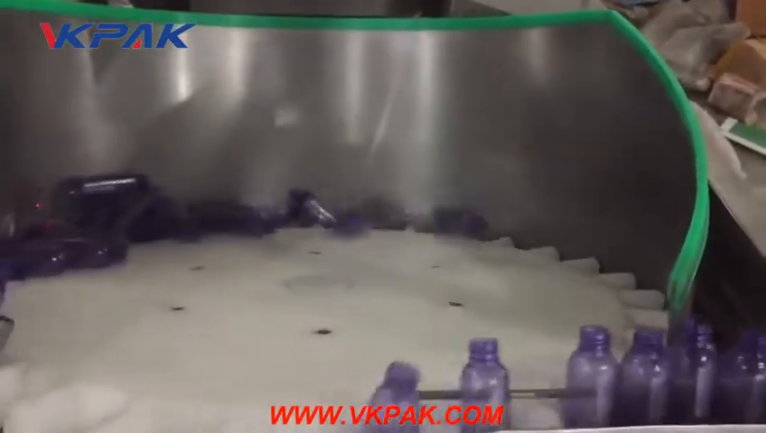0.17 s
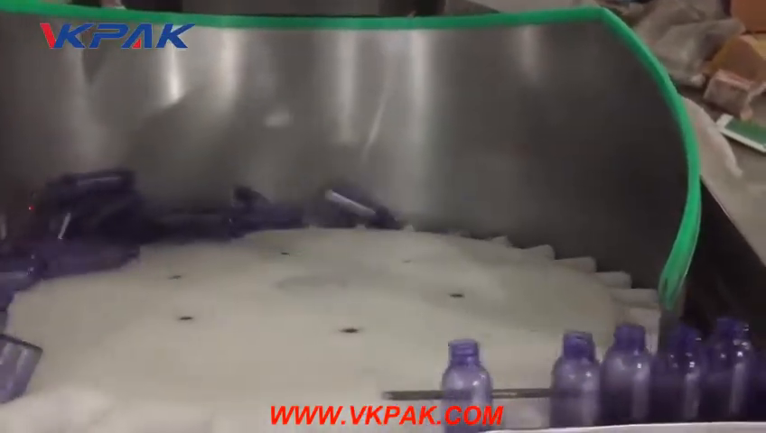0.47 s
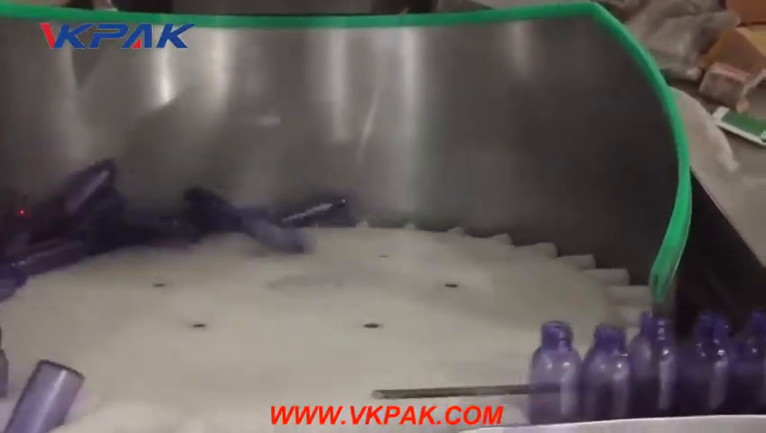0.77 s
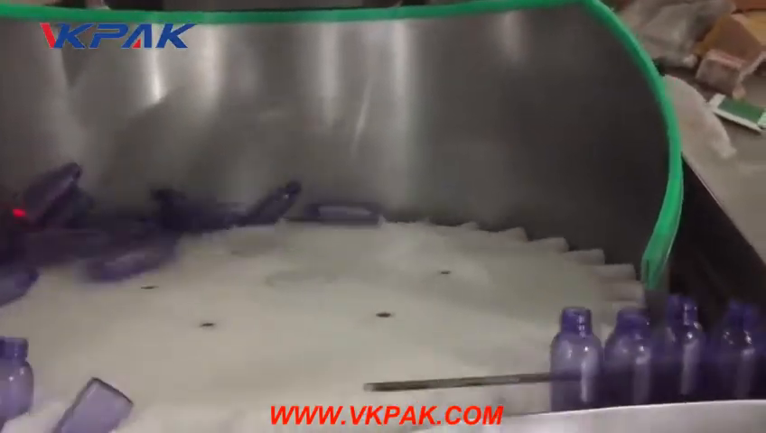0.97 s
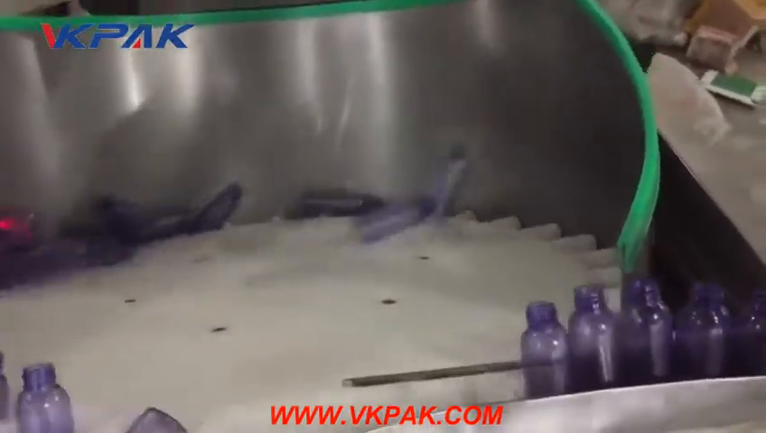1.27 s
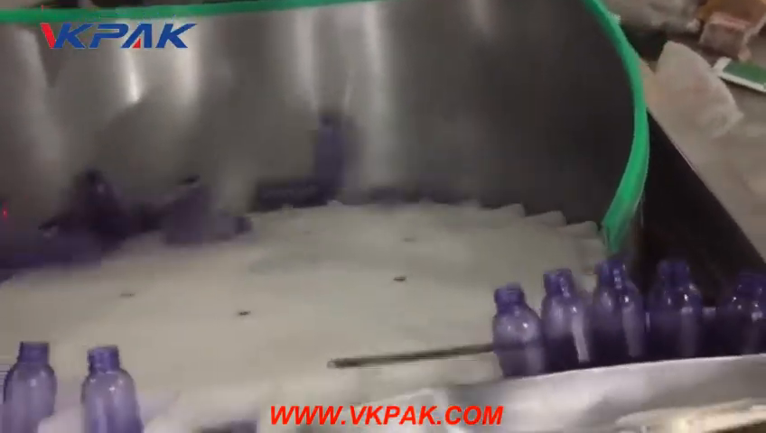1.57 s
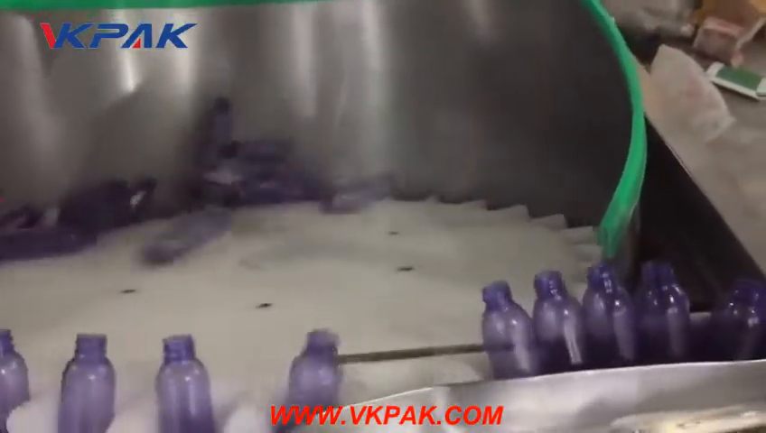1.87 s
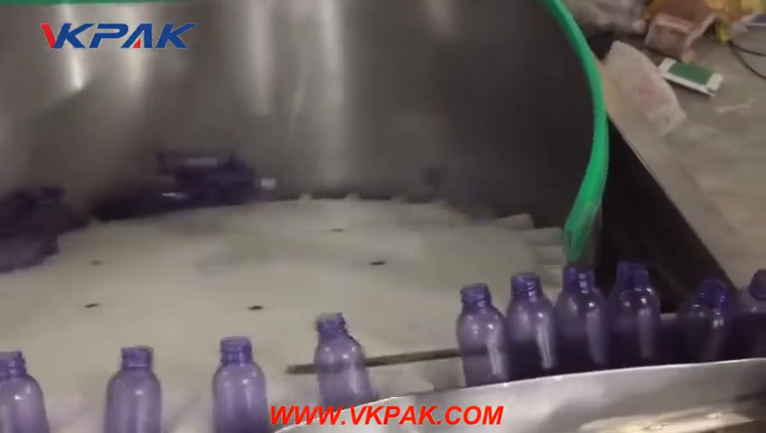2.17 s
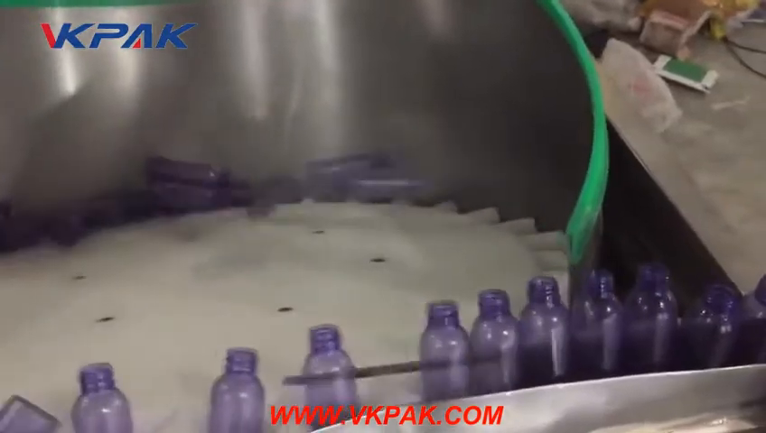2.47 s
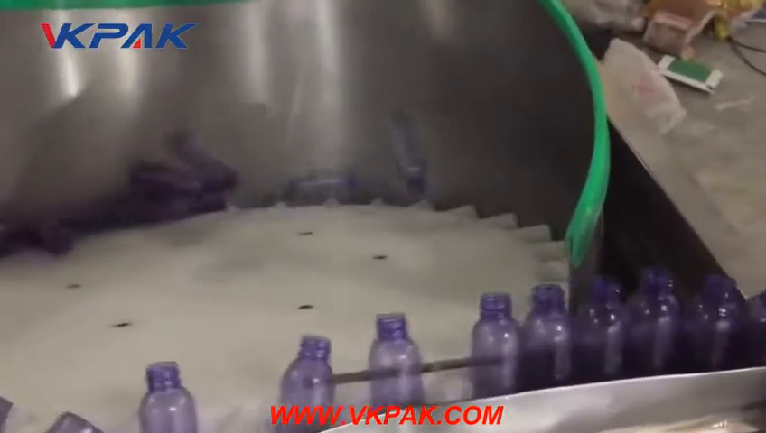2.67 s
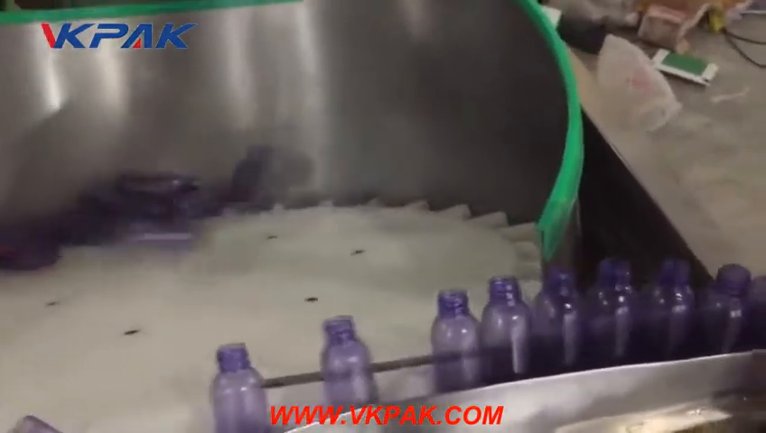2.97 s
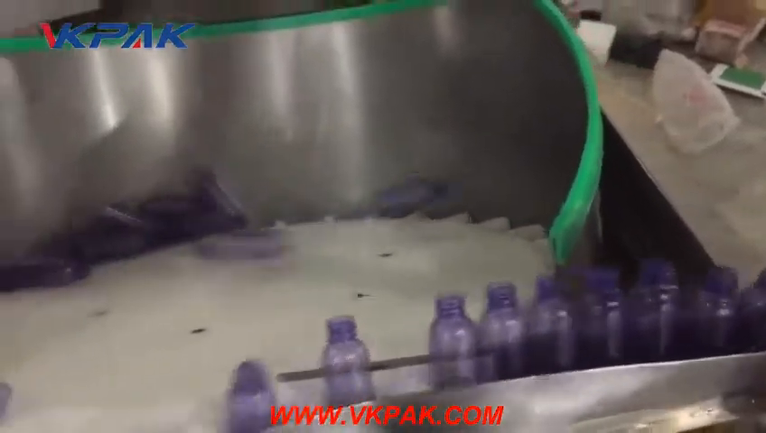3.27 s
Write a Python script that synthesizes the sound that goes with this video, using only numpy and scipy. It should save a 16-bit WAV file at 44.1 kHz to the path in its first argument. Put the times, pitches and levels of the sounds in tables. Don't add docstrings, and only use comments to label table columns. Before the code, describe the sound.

Plastic bottles knock and bounce in a turning metal sorter, lighter at first, then harder cracks from about one second; air jets hiss, motor hums, faint hoots cross bottle mouths, picked up nearby on a phone.

```python
import sys
import numpy as np
from scipy import signal
from scipy.fft import rfft, irfft, next_fast_len
from scipy.io import wavfile
from scipy.ndimage import uniform_filter1d, map_coordinates

SR = 44100
rng = np.random.default_rng(int(sys.argv[2]) if len(sys.argv) > 2 else 0)


def voltage_ratio(decibels):
    exponent = np.asarray(decibels, float) / 20
    return 10 ** exponent


def file_out(sig):
    cols = np.atleast_2d(sig).T
    lim = np.clip(cols, -1, 1)
    pcm = np.round(lim * 32767).astype(np.int16)
    wavfile.write(sys.argv[1], SR, pcm)


N = 150381

# (frequency [Hz], level [dB per Hz])
HISS_SPECTRUM = [(1760, -64), (3000, -8), (3200, -7), (4110, -4.5), (6350, -4), (7010, -3.5), (7620, -5),
                 (8580, 0.5), (9750, -3.5), (12700, -26), (21400, -120)]
# (time [s], level [dB])
JET_LEVEL = [(0.0, -27), (.98, -27), (1.2, -28), (1.55, -27.5), (2.37, -28), (3.05, -25.5), (3.41, -28)]
# (frequency [Hz], width [Hz], depth [share])
HISS_DIPS = [(4850, 450, .45), (7550, 600, .4)]
# (frequency [Hz], level [dB per Hz])
ROAR_SPECTRUM = [(15, -32), (25, -6.5), (140, -4.5), (395, -7.5), (631, -4.5), (1190, -10.5), (2160, -9.5),
                 (2450, -11), (4000, -17.5), (5200, -39.5), (8800, -120)]
# (frequency [Hz], level [dB])
MOTOR_TONES = [(65.5, -44), (118, -40), (144, -40), (197, -44), (330, -49.5), (341, -45.5), (643, -45.5),
               (721, -50)]
# (time [s], frequency [Hz], level [dB])
BEARING_GROAN = [
    (2.05, 113.7, -68),
    (2.2, 126.3, -36),
    (2.45, 140.8, -33),
    (2.7, 164.6, -55),
    (2.8, 157, -44.5),
]
# (time [s], length [s], frequency [Hz], level [dB], pitch sag [share])
BOTTLE_HOOTS = [
    (.635, .08, 533.4, -25.5, 0.0066),
    (.75, 0.069, 528, -32.5, 0.009),
    (.94, 0.06, 520, -32, 0.021),
    (1.02, .085, 551.6, -27, 0.034),
    (2.52, 0.088, 561, -35.5, 0.0062),
]
# (time [s], level [dB])
HEAP_LEVEL = [(0, -26.5), (.5, -30.5), (1.1, -30.5), (1.25, -42), (1.4, -30), (1.9, -24.5), (2.45, -28.5),
              (2.9, -30), (3.41, -32)]
# (time [s], peak [dB], frequency [Hz], fall by 60 dB [s])
BOUNCES = [(.001, -17, 2030, .08), (.063, -19, 2280, .05), (.1755, -13.5, 958, .05),
           (.181, -21, 1700, 0.057), (.215, -21, 2240, 0.091), (0.3193, -14, 996, 0.024),
           (0.3207, -15, 1740, .03), (.328, -18.5, 1180, .06), (.338, -25, 2100, 0.035),
           (.8, -22.5, 1800, .15), (1.0754, -11.5, 2930, 0.041), (1.078, -14.5, 500, 0.11),
           (1.085, -11.5, 2252, .1), (1.086, -15.5, 1934, 0.15), (1.102, -12, 2200, 0.054),
           (1.459, -17.5, 1680, .08), (1.47, -19, 1280, 0.24), (1.594, -18, 1840, 0.079),
           (1.699, -13.5, 3190, .04), (1.838, -15.5, 2353, 0.078), (2.060, -15, 3480, 0.038),
           (2.060, -13, 902, 0.055), (2.062, -10.5, 1993, 0.12), (2.066, -15, 3150, .04),
           (2.066, -19.5, 545, .08), (2.081, -11.5, 2257, .05), (2.092, -13, 2110, .05),
           (2.098, -11, 2140, 0.034), (2.332, -17.5, 1820, 0.056), (2.344, -14, 2060, 0.17),
           (2.659, -17, 3090, .04), (2.675, -13.5, 2010, 0.037), (2.678, -14, 900, .05),
           (2.686, -14, 1200, 0.07), (2.699, -19, 1400, 0.025), (2.7245, -14.5, 997, .04),
           (2.732, -17.5, 1735, 0.077), (2.742, -15, 2060, .06), (2.747, -18.5, 3430, 0.033),
           (2.752, -13.5, 1284, .06), (2.767, -18, 2080, 0.042), (3.0464, -19, 2410, .06),
           (3.047, -19, 2990, .04), (3.059, -18, 1074, 0.036), (3.068, -18, 1690, .04),
           (3.081, -14.5, 1553, .08), (3.088, -22, 1207, 0.043), (3.094, -23, 2000, 0.053),
           (3.158, -20.5, 2250, 0.12)]
# (time [s], peak [dB])
EDGE_SNAPS = [(0.0398, -13.5), (0.0643, -15), (.43, -15.5), (.578, -15), (1.457, -10), (1.587, -13),
              (1.699, -9), (1.72, -11), (2.0545, -9), (2.333, -8.5), (2.7003, -6), (2.7245, -7),
              (3.0467, -9)]
# (frequency [Hz], level [dB], fall by 60 dB [s])
WALL_TONES = [(543.5, -11, 0.16), (745, -12.5, 0.22), (883, -9.5, 0.18), (1109, -6, 0.19),
              (1197, -7.5, 0.9), (1285, -12, 1), (1683, -4.5, 0.5), (1827, -4, 0.15), (1967, -0.5, 0.15),
              (2071, -4, 0.5), (2228, 0.5, 0.15), (2394, -0.5, 0.11), (2896, -2.5, 0.061),
              (3270, -11, 0.067)]
# (time [s], peak [dB], brightness [dB], fall by 60 dB [s],
# neck ring [dB])
SOFT_KNOCKS = [(0.2126, -12, -4.5, 0.18, -20), (0.425, -9.5, -8, 0.17, -19), (0.5741, -10, -8, 0.28, -17),
               (0.8046, -9.5, -11, 0.11, -10), (0.9675, -14.5, -5, 0.89, -40),
               (1.0344, -14, -10, 0.33, -27), (1.1564, -14, -17, 0.08, -20),
               (1.3294, -12.5, 5.5, 0.29, -29), (1.3988, -10, -16, 0.48, -5),
               (1.5609, -9.5, -8.5, 0.26, -17), (1.7813, -12.5, -12, 0.33, -24),
               (1.8444, -18, -12, 0.43, -30), (1.933, -8.5, -8, 0.34, -6), (2.5169, -7, -11, 0.19, -20),
               (2.5994, -14, -15, 0.45, -7), (2.6585, -11.5, -10.5, 0.24, -18), (2.8511, -8, 1, 0.21, -22),
               (3.1549, -10.5, -9.5, 0.14, -10.5), (3.3719, -8, -15.5, 0.12, -37)]
# (time [s], peak [dB], brightness [dB], fall by 60 dB [s], neck ring [dB])
HARD_KNOCKS = [(0.0005, -8.5, -9.5, 0.15, -29), (0.0325, -9.5, -11, 0.18, -7.5),
               (0.1755, -10, -10.5, 0.26, 0.5), (0.3201, -9.5, -12.5, 0.16, -38),
               (1.074, -2, -6.5, 0.13, -58), (1.4571, -1, -3, 0.2, -36), (1.5912, -7.5, -6.5, 0.29, -27),
               (1.6985, -6.5, -5, 0.12, -18.5), (1.8279, -8, -5.5, 0.37, -23),
               (1.8714, -7.5, -7, 0.11, -52), (2.0542, -5, -5.5, 0.38, -5),
               (2.0814, -16.5, -6.5, 0.18, -34), (2.33, -1.5, -3.5, 0.12, -7),
               (2.674, -5.5, -10.5, 0.4, -14), (2.6995, -6.5, -11, 0.067, -22),
               (2.7243, -6.5, -5, 0.22, -6), (2.7494, -13, -8, 0.2, -3.5), (3.046, -7.5, -4.5, 0.08, -9),
               (3.0667, -15, -16.5, 0.65, -6), (3.079, -11, -6.5, 0.27, -17)]
# (frequency [Hz], step [dB])
TREBLE_STEPS = [(1800, -36), (2500, -19), (3800, -18), (5000, -18.5), (6200, -15.5), (7600, -17.5),
                (8300, -19), (9700, -24)]
# (time [s], change [dB])
STEP_CHANGE = [(0, -1), (.6, -1), (.75, 1), (1.4, 1.2), (2.1, .2), (2.8, -.3), (3.41, -1)]


def unit(x):
    return x / np.sqrt(np.mean(x ** 2) + 1e-20)


def along(points, hz):
    f, v = np.transpose(points)
    return np.interp(np.log(hz + 1), np.log(f + 1), v)


def curves(rows):
    s, *columns = np.transpose(rows)
    return [np.interp(np.arange(N) / SR, s, column) for column in columns]


def wobble(rate):
    return map_coordinates(rng.standard_normal(400), [np.arange(N) * min(rate, 100) / SR])


def filtered(x, response):
    m = next_fast_len(len(x) + 8192)
    return irfft(rfft(x, m) * response(np.fft.rfftfreq(m, 1 / SR)), m)[:len(x)]


def peak(f, hz, width_hz):
    return 1j * f * width_hz / (hz * hz - f * f + 1j * f * width_hz)


def rush(spectrum, patchy_db):
    z = signal.stft(rng.standard_normal(N), nperseg=512)[2]
    patches = uniform_filter1d(rng.standard_normal(z.shape), size=4, axis=0)
    patches = uniform_filter1d(patches, size=8, axis=1)
    x = signal.istft(z * voltage_ratio(patchy_db * unit(patches)), nperseg=512)[1][:N]
    return unit(filtered(x, lambda hz: voltage_ratio(along(spectrum, hz))))


def drum_echo(x):
    t = np.arange(SR // 2) / SR
    tail = rng.standard_normal(len(t)) * voltage_ratio(-60 * t / 0.24)
    delayed = np.pad(x, (150, 0))
    return signal.fftconvolve(delayed, tail / np.linalg.norm(tail))[:N]


def air_jets():
    jet_db, = curves(JET_LEVEL)
    raw = rush(HISS_SPECTRUM, patchy_db=2.5)

    def dipped(shift):
        def response(f):
            dips = [1 - np.clip(depth, 0, .9) * peak(f, hz * shift, width)
                    for hz, width, depth in HISS_DIPS]
            return np.prod(dips, axis=0)
        return filtered(raw, response)

    low, high = dipped(.97), dipped(1.04)
    swell_db = .6 * wobble(5)
    flutter_db = 0.31 * wobble(9.5) + 0.83 * wobble(40.99)
    roar = voltage_ratio(-28 + swell_db) * rush(ROAR_SPECTRUM, patchy_db=2.5)
    mix = .5 + .5 * np.tanh(2 * wobble(6))
    hiss = unit(mix * low + (1 - mix) * high)
    return voltage_ratio(jet_db + flutter_db) * hiss + roar


def motor_and_gears():
    t = np.arange(N) / SR
    hum = np.zeros(N)
    for hz, db in MOTOR_TONES:
        level = voltage_ratio(db + 5 + 1.2 * wobble(5.8))
        phase = 0.53 * wobble(6) + 6 * rng.random()
        hum += level * np.sin(2 * np.pi * hz * t + phase)
    hz, db = curves(BEARING_GROAN)
    groan = voltage_ratio(db + 2.5 + 3.8 * wobble(36)) * np.sin(2 * np.pi * np.cumsum(hz) / SR)
    return hum + groan


def hoots():
    out = np.zeros(N)
    t = np.arange(N) / SR
    for s, length, hz, db, sag in BOTTLE_HOOTS:
        u = np.clip((t - s) / length, 0, 1)
        breath = unit(filtered(rng.standard_normal(N), lambda f: peak(f, hz, 56) ** 2))
        tone = np.sin(2 * np.pi * hz * (t - s) * (1 - sag * u)) * voltage_ratio(2 * wobble(60))
        swell = np.sqrt(np.abs(np.sin(np.pi * u))) * (u < 1)
        out += voltage_ratio(db) * swell * (tone + .4 * breath)
    return out


def heap():
    clacks_per_s, usual_hz, length = 280, 1733, 900
    level_db, = curves(HEAP_LEVEL)
    luck = rng.standard_normal((int(min(clacks_per_s * N / SR, 1500)), 4))
    start = ((luck[:, 0] * 50 % 1) * N).astype(int)
    hz = usual_hz * np.exp(0.424 * luck[:, 1:2])
    t = np.arange(length) / SR
    clacks = voltage_ratio(0.97 * luck[:, 2:3]) * np.sin(2 * np.pi * hz * t) * np.exp(-t * hz / 7)
    where = start[:, None] + np.arange(length)
    x = np.bincount(where.ravel(), clacks.ravel(), N + length)[:N]
    return voltage_ratio(level_db - 5.5) * unit(x)


def bounces_and_snaps():
    rise_s, snap_hz, snap_t60 = 0.00048, 2680, .004
    out, t = np.zeros(N + SR), np.arange(SR // 8) / SR
    for s, db, hz, t60 in BOUNCES:
        fade = voltage_ratio(db - 60 * t / max(t60, .015))
        bounce = fade * (1 - np.exp(-t / rise_s)) * np.sin(2 * np.pi * hz * t)
        out[round(s * SR):][:len(t)] += bounce
    for s, db in EDGE_SNAPS:
        fade = voltage_ratio(db + 3 - 60 * t / snap_t60)
        rise = np.sin(np.pi * np.minimum(t * snap_hz / 2, .5))
        out[round(s * SR):][:len(t)] += fade * rise * np.sin(2 * np.pi * snap_hz * t)
    return out[:N]


def knocks(rows, gain_db):
    usual_tilt_db, chatter_s, chatter_db = -5.5, .02, 5.5
    neck_hz, neck_t60 = 3500, 0.031
    out, t = np.zeros(N + SR), np.arange(SR // 3) / SR
    for s, db, tilt, t60, neck_db in rows:
        noise = rng.standard_normal(len(t))
        luck = rng.standard_normal((3, len(WALL_TONES)))

        def slant(hz):
            octaves = np.log2(np.clip(hz, 950, 3500) / 1800)
            return voltage_ratio((tilt - usual_tilt_db) * 1.6 * octaves)

        blows = np.zeros(len(t))
        blows[0] = 1
        rebounds = (np.cumsum(.4 + np.abs(luck[0, :4])) * chatter_s / 2 * SR).astype(int)
        blows[rebounds] = voltage_ratio(-chatter_db * np.arange(1, 5) / 2 + 2 * luck[1, :4])
        click = filtered(blows, lambda f: 12 * slant(f) * peak(f, 2600, 2000) ** 2)

        fade = voltage_ratio(-60 * (t / max(t60, .11)) ** 1.11)
        ring = np.zeros(len(t))
        for k, (hz, level, life) in enumerate(WALL_TONES):
            tone = np.sin(2 * np.pi * hz * (1 + 0.0075 * luck[1, k]) * t)
            ring += slant(hz) * voltage_ratio(level + 1.6 * luck[2, k] - 30 * t / life) * tone

        dense = filtered(noise, lambda f: 3 * slant(f) * peak(f, 1900, 2000) ** 2 / (1 + (f / 3800) ** 12))
        grain_db = 30 * uniform_filter1d(rng.standard_normal(len(t)), size=220)
        dense = dense * fade ** 1.1 * voltage_ratio(grain_db)

        neck_fade = 1.45 * voltage_ratio(neck_db + 10 - 60 * t / neck_t60) * (1 - np.exp(-t / 0.00086))
        neck = neck_fade * np.sin(2 * np.pi * neck_hz * (1 + .012 * luck[0, 5]) * t)
        crack = voltage_ratio(-35 - 60 * t / 0.0028) * noise
        body = voltage_ratio(-3.5) * ring * np.sqrt(fade) + voltage_ratio(1.5) * dense + crack
        hit = body * (1 - np.exp(-t / 0.00018)) + click
        hit = hit / np.std(hit[:SR // 80])
        out[round(s * SR):][:len(t)] += voltage_ratio(db + gain_db) * (hit + neck)
    return out[:N]


def scene():
    bottles = knocks(HARD_KNOCKS, -12) + knocks(SOFT_KNOCKS, -15.5) + heap() + bounces_and_snaps()
    mono = bottles + voltage_ratio(-12) * drum_echo(bottles) + hoots() + air_jets() + motor_and_gears()
    return np.array([mono, mono])


def gain_control(x):
    threshold_db, recovery_s, cut_db = -19, 0.26, 3
    level_db = 10 * np.log10(np.abs(uniform_filter1d(x ** 2, size=441)) + 1e-9)
    t = np.arange(SR) / SR
    memory = np.exp(-t / recovery_s) * (1 - np.exp(-t / 0.0022))
    over_db = np.maximum(level_db - threshold_db, 0)
    excess = signal.fftconvolve(over_db, memory)[:N] / (0.047 * SR)
    return x * voltage_ratio(-cut_db * np.minimum(excess, 10) / 10)


def thin_treble(x):
    size, top_hz, scatter_db = 1024, 9760, 2.1
    loud_db, skirt_db = -15.5, -29
    n, k = np.arange(2 * size), np.arange(size // 2)[:, None]
    window = np.sin(np.pi * (n + .5) / (2 * size))
    cosines = np.cos(np.pi / size * (n + .5 + size / 2) * (k + .5))
    basis = np.sqrt(2 / size) * window * cosines
    frames = N // size + 2
    index = np.arange(frames)[:, None] * size + n
    tones = np.pad(x, (size, 3 * size))[index] @ basis.T
    hz = (k[:, 0] + .5) * SR / 2 / size

    scatter = rng.standard_normal((frames, size // 20 + 1))
    scatter = np.repeat(scatter, 10, axis=1)[:, 3:size // 2 + 3]
    change_db = np.interp(np.arange(frames) * size / SR, *np.transpose(STEP_CHANGE))[:, None]
    step = voltage_ratio(along(TREBLE_STEPS, hz) + change_db + scatter_db * scatter)
    rounded = 0.98 * np.round(tones / step) * step + 0.028 * tones

    loud = np.sqrt(np.mean(tones[:, 47:167] ** 2, axis=1, keepdims=True)) > voltage_ratio(loud_db)
    skirt = tones * loud * voltage_ratio(skirt_db) * (hz < 10340)
    tones = np.where(hz < top_hz, rounded, skirt)
    return np.bincount(index.ravel(), (tones @ basis).ravel())[size:size + N]


def band_limit(x):
    return signal.sosfilt(signal.butter(12, 10890, fs=SR, output="sos"), x)


def record(dry):
    low_cut_hz = 50.4
    mono = filtered(dry[0], lambda hz: (1j * hz / (low_cut_hz + 1j * hz)) ** 2)
    mono = gain_control(mono)
    mono = mono / (1 + np.abs(mono / .75) ** 6) ** (1 / 6)
    mono = thin_treble(mono)
    return band_limit(np.array([mono, mono]))


dry = scene()
out = record(dry)
file_out(out)
```